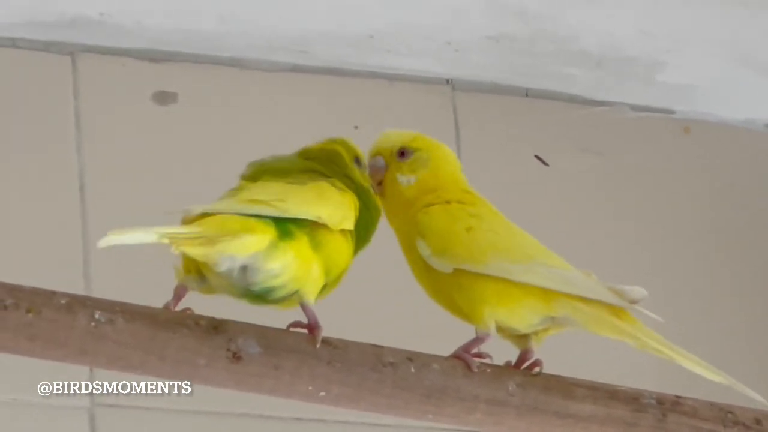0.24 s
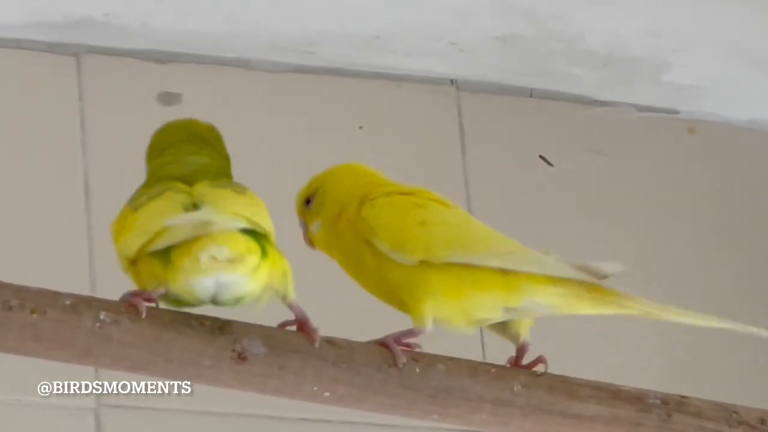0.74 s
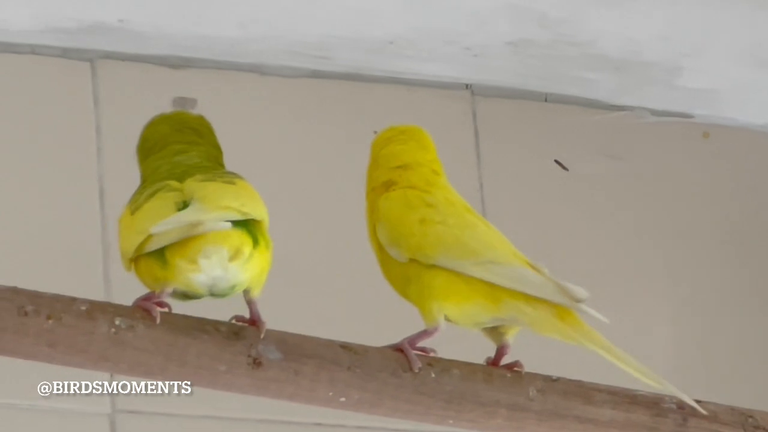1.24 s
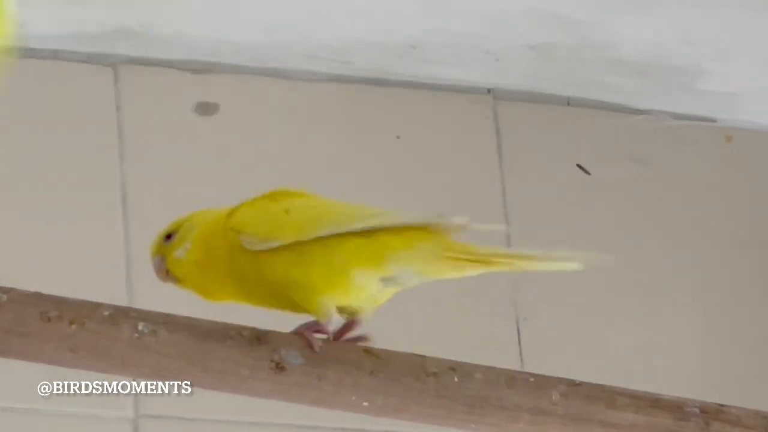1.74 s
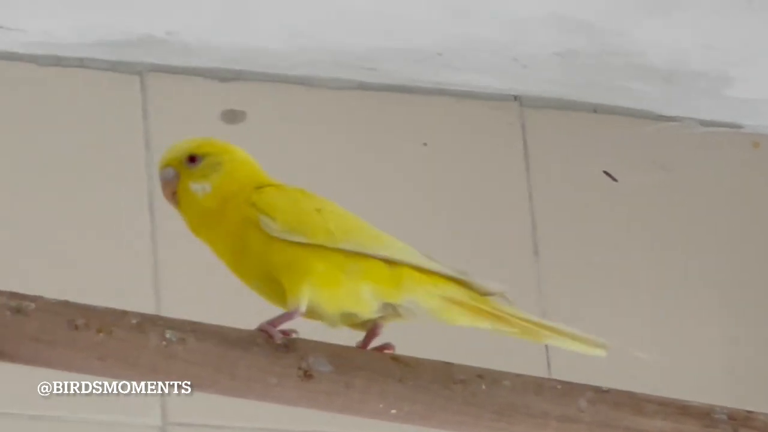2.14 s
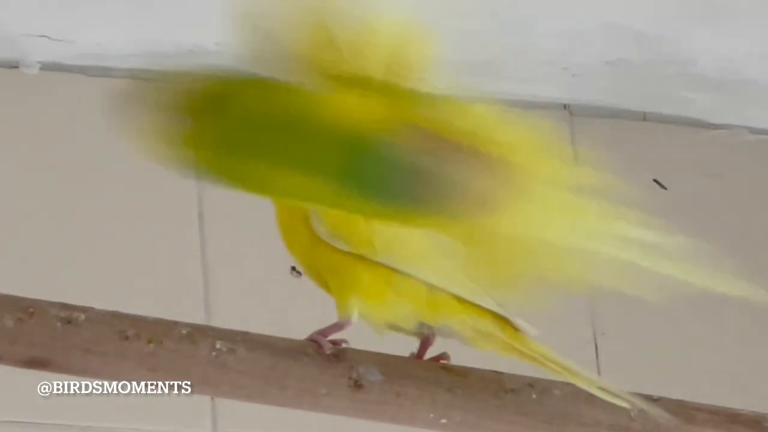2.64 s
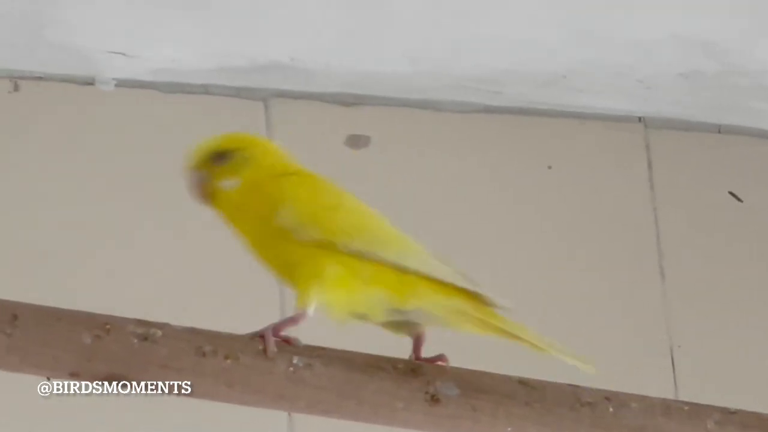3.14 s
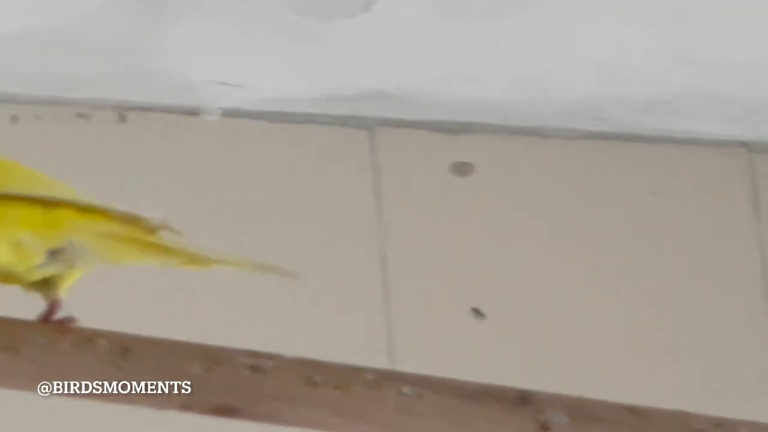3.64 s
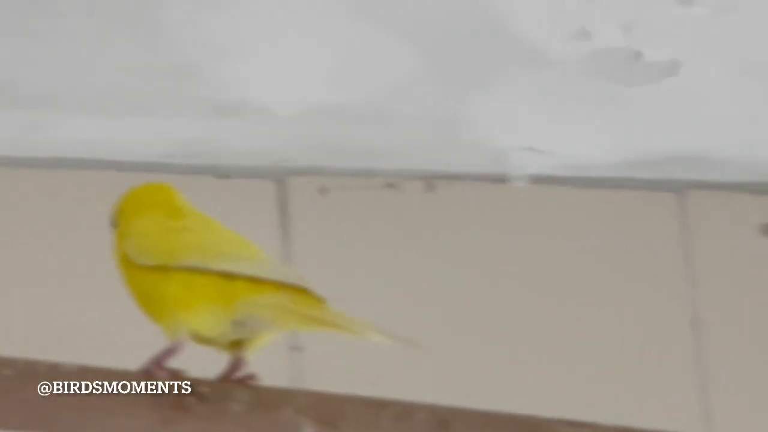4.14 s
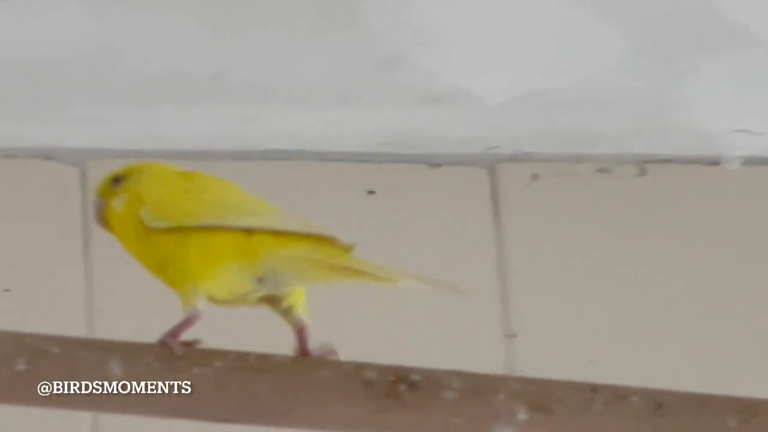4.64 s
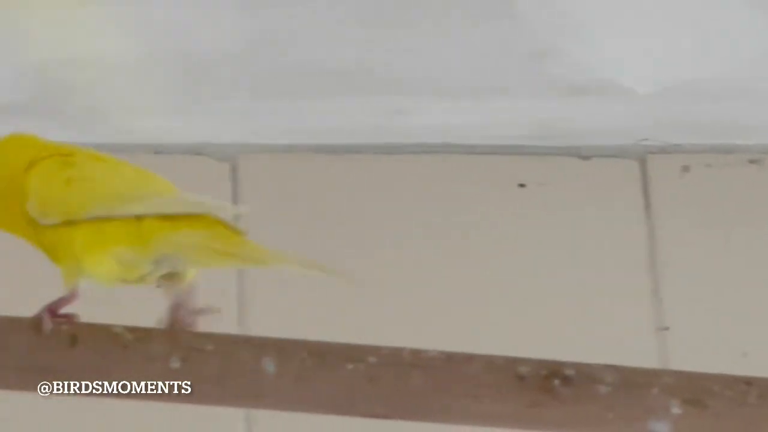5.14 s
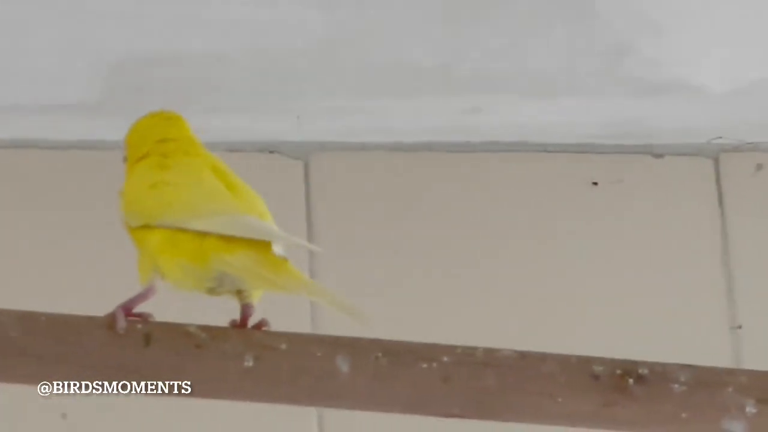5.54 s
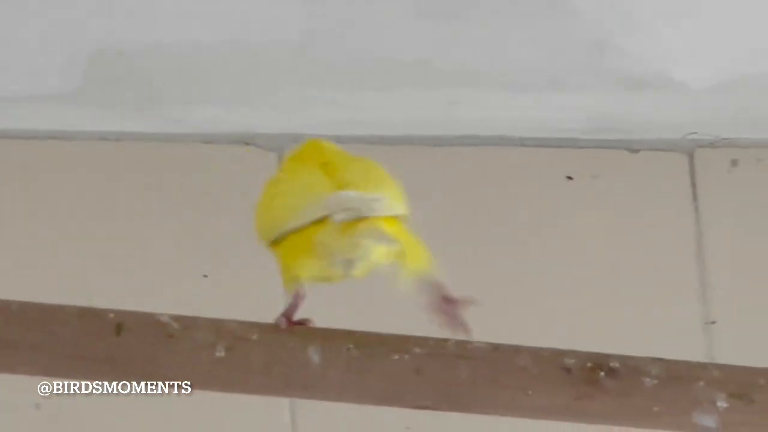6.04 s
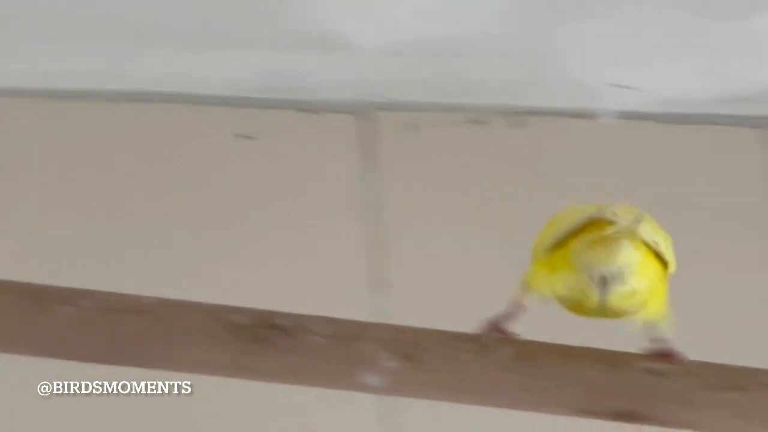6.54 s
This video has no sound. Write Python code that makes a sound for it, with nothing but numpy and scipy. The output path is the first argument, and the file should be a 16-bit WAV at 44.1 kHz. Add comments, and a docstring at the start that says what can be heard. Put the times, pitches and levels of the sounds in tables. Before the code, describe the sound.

Budgerigars chirp and warble in a tiled room, breaking twice into harsh scolding squawks with fluttering wings, over a faint hum.

```python
"""Budgerigars chatter in a tiled room: warbled whistles, nasal chups and two runs of scolding squawks.
The syrinx sings short gliding, quivering notes; in a squawk its membranes slap out harsh puffs of noise.
Two wing flutters shove the air and set a low room mode booming. Beaks and claws tick on a wooden perch,
feathers rustle, and under it all lies a bed of room air with a faint machine hum."""
import sys
import numpy as np
from scipy import signal
from scipy.fft import rfft, irfft, next_fast_len
from scipy.io import wavfile
from scipy.ndimage import map_coordinates

SR = 44100
rng = np.random.default_rng(int(sys.argv[2]) if len(sys.argv) > 2 else 0)


def wav_record(signal):
    """Record a signal, one row per channel, as 16-bit PCM in the file named by sys.argv[1]."""
    frames = np.transpose(np.atleast_2d(signal))
    bounded = np.clip(frames, -1, 1)
    # unit amplitude maps onto the largest positive 16-bit level
    quanta = np.round(bounded * 32767).astype(np.int16)
    wavfile.write(sys.argv[1], SR, quanta)


N = 298557
TIME = np.arange(N) / SR


# Loose warble notes: start_s, length_s, start_hz, mid_hz, level_db, roughness (0-1)
WARBLE = [ (0.000, 0.018, 3010, 2997, -31, 0.31), (0.722, 0.029, 4900, 4710, -51, 0.44),
          (0.834, 0.054, 4100, 3630, -40.5, 0.48), (0.886, 0.087, 3456, 3306, -33, 0.43),
          (0.908, 0.017, 2500, 2480, -36, 0.52), (0.932, 0.067, 2940, 2906, -27.5, 0.33),
          (1.345, 0.09, 2570, 2306, -48.5, 0.16), (1.433, 0.057, 3114, 2950, -34, 0.22),
          (1.490, 0.031, 4700, 3930, -34.5, 0.12), (1.642, 0.01, 6540, 5100, -38, 0.3),
          (3.195, 0.018, 4100, 4150, -41.5, 0.09), (3.788, 0.007, 3120, 2890, -34.5, 0.32),
          (3.847, 0.027, 2576, 2940, -25.5, 0.17), (4.027, 0.04, 3910, 3630, -37.5, 0.3),
          (4.123, 0.022, 2500, 2970, -24.5, 0.17), (4.413, 0.041, 3000, 2450, -36, 0.03),
          (4.458, 0.036, 2230, 2297, -32.5, 0.67), (4.477, 0.037, 2850, 3184, -36, 0.2),
          (5.798, 0.019, 2544, 2430, -30.5, 0), (6.030, 0.02, 5160, 4070, -34, 0.09),
          (6.052, 0.026, 3730, 3770, -21.5, 0.17), (6.096, 0.028, 3120, 2897, -17.5, 0.15),
          (6.133, 0.025, 3495, 3530, -25.5, 0.4), (6.139, 0.023, 2020, 1970, -36.5, 0.79),
          (6.654, 0.02, 3110, 3170, -31, 0.1), (6.680, 0.039, 1960, 1910, -37.5, 0.6)]
# Chups, a nasal grunt breaking into a falling flick:
# flick_start_s, flick_length_s, flick_hz, flick_db, grunt_length_s, grunt_hz, grunt_db
CHUPS = [(0.146, 0.037, 2644, -40, 0.017, 973, -44), (0.292, 0.049, 2605, -41.5, 0.017, 958, -46),
         (0.437, 0.022, 2677, -36.5, 0.02, 994, -44.5), (3.232, 0.015, 2560, -25, 0.027, 996, -33),
         (3.815, 0.01, 2693, -25, 0.021, 1030, -35.5), (3.941, 0.017, 2694, -32, 0.035, 812, -40.5),
         (4.070, 0.018, 2630, -24, 0.058, 1038, -40), (4.379, 0.018, 2850, -29, 0.024, 920, -34.5),
         (4.596, 0.042, 2670, -24, 0.027, 829, -35), (5.773, 0.016, 2380, -28.5, 0.03, 856, -33),
         (6.565, 0.024, 2620, -27, 0.034, 1036, -34)]
# Chirrups, a loud note and its lead-in: start_s, length_s, pitch_hz, level_db, lead_length_s, lead_db
CHIRRUPS = [(3.285, 0.029, 3011, -16, 0.022, -26.5), (4.684, 0.021, 3135, -20, 0.036, -30),
            (5.844, 0.036, 3140, -23, 0.022, -31.5), (6.611, 0.029, 3060, -20, 0.022, -26)]


def whistle_notes(tail_s=0.036, tail_db=-28):
    """Everything the syrinx whistles, laid out as rows like WARBLE."""
    notes = list(WARBLE)
    for start, length, hz, db, *_ in CHUPS:
        notes.append((start, length, hz * 1.1, hz, db, 0.23))  # falling flick
    for start, length, hz, db, lead_s, lead_db in CHIRRUPS:
        notes += [(start - lead_s, lead_s, hz, hz * 1.15, lead_db, 0.22),  # rising lead-in
                  (start, length, hz * 1.08, hz, db, 0.15),  # loud fall
                  (start + length, tail_s, hz * 0.805, hz * 0.805, tail_db, 0.42)]  # low, rough tail
    return notes


# Throat and beak EQ on the whistle overtones: freq_hz, gain_db
OVERTONE_EQ = [(3600, -3), (5200, -6), (6200, -8), (7300, 2.5), (9000, -3), (11000, -9.5), (13000, -14)]


def whistles(settle_share=0.67, quiver=0.132, flutter_db=7, arch_db=6, skirt_db=-14, third_db=-5):
    """The syrinx starts off pitch and settles; rough notes quiver in pitch and level."""
    tones, overtones = np.zeros((2, N))
    for start, length, start_hz, mid_hz, db, roughness in whistle_notes():
        t = clock(length)
        slack, mid_slack = np.exp(-t / t[-1] / settle_share), np.exp(-0.5 / settle_share)
        glide_hz = mid_hz + (start_hz - mid_hz) * (slack - mid_slack) / (1 - mid_slack)
        phase = phase_of(glide_hz * (1 + quiver * roughness * wobble(t, 454.4)))
        # pressure peaks in the middle of the note
        pressure_db = flutter_db * roughness * wobble(t, 221) - arch_db * (2 * t / t[-1] - 1) ** 2
        envelope = amp(db) * np.sqrt(2) * unit(amp(pressure_db) * gate(t, edge_s=0.0015))
        # turbulent airflow spreads a skirt around each partial, widest on the overtones
        add(tones, start, envelope * np.sin(phase) * (1 + amp(skirt_db) * wobble(t, 1106)))
        rasp = unit(1 + 0.55 * wobble(t, 1854))
        upper = np.sin(2 * phase) + amp(third_db) * np.sin(3 * phase)
        # notes sung on the throat resonance are the purest
        overtone_db = -8 - 18 * bell(mid_hz, centre_hz=2730, width_hz=1470)
        add(overtones, start, envelope * amp(overtone_db) * upper * rasp)
    return tones + equalise(overtones, OVERTONE_EQ)


# Squawks and soft rasps: start_s, swell_s, length_s, level_db, beak_hz, tilt_db_per_octave
SQUAWKS = [ (0.000, 0.0086, 0.12, -45, 6100, -5.5), (1.479, 0.02, 0.07, -37.5, 4030, -3),
           (1.646, 0.045, 0.051, -15, 3730, 10), (1.808, 0.026, 0.046, -15.5, 6000, 9),
           (2.042, 0.02, 0.066, -20, 4400, 7.5), (2.299, 0.043, 0.052, -16.5, 4750, 7.5),
           (2.402, 0.043, 0.13, -28.5, 2830, -1), (2.470, 0.012, 0.063, -18, 3870, 4),
           (2.615, 0.034, 0.062, -18, 4050, 5), (2.776, 0.039, 0.071, -17.5, 6360, 8.5),
           (2.847, 0.031, 0.082, -21, 4920, 3.5), (3.942, 0.01, 0.031, -34, 3440, -13.5),
           (4.101, 0.028, 0.027, -36, 4200, 0), (4.358, 0.0026, 0.042, -40.5, 3320, 7.5),
           (4.416, 0.009, 0.1, -34, 2170, -8), (4.589, 0.014, 0.08, -33.5, 2650, -4.5),
           (4.813, 0.026, 0.17, -44, 6540, -6), (5.052, 0.032, 0.039, -14.5, 3750, 9),
           (5.202, 0.03, 0.062, -17, 5500, 7), (5.496, 0.038, 0.046, -15, 6900, 8.5)]
# Throat EQ of a squawk: freq_hz, gain_db
SQUAWK_EQ = [(900, -65), (1300, -14.5), (1700, -4), (2400, -3), (3200, -0.5), (4400, -3), (6500, -9),
             (8300, -13.5), (9800, -17.5), (10900, -16.5), (11700, -23.5), (12700, -43)]


def squawks(slap_hz=206.8, jitter=0.24, scatter_db=1.3, decay_cycles=0.53,
            cry_hz=3394, cry_quiver=0.0972, cry_db=-8, swell_db=20, sag_db=5, release_s=0.0086):
    """The membranes slap irregularly; each slap lets a chaotic puff through throat and beak."""
    out = np.zeros(N)
    for start, swell_s, length, db, beak_hz, tilt in SQUAWKS:
        t = clock(length)
        cycle = np.cumsum(slap_hz * (1 + jitter * wobble(t, 200))) / SR % 1
        # the overdriven whistle survives inside the noise as a wildly shaking cry
        phase = phase_of(cry_hz * (1 + cry_quiver * wobble(t, 700)))
        cry = unit(sum(np.sin(k * phase) for k in range(1, 4)))
        breath = hiss(t) + amp(cry_db) * cry
        puffs = breath * np.exp(-cycle / decay_cycles) * amp(scatter_db * wobble(t, 196))
        ring_db = min(4.5 + 0.48 * (-15 - db), 13)  # softer squawks ring more in the beak
        voice = shape(puffs, lambda f: amp(lookup(SQUAWK_EQ, f)
                                           + tilt * np.log2(np.maximum(f, 1000) / 4000)
                                           + ring_db * bell(f, beak_hz, width_hz=1300)))
        # pressure builds quickly, then sags until the beak shuts
        attack_db = -swell_db * np.maximum(1 - t / swell_s, 0) ** 2.68
        droop_db = sag_db * np.maximum(t - swell_s, 0) / length
        edges = gate(t, edge_s=np.where(t < swell_s, 0.002, release_s))
        add(out, start, amp(db + attack_db - droop_db) * unit(voice) * edges)
    return out


# Lone nasal notes: start_s, length_s, pitch_hz, level_db
NASALS = [(0.722, 0.0695, 974, -43), (1.314, 0.071, 981, -49.5)]
# Throat EQ of a nasal note: freq_hz, gain_db
NASAL_EQ = [(1000, -43), (1600, -1.5), (2000, 0), (2450, -2), (3100, 0.5), (3500, 1), (4000, -12.5),
            (4900, -20.5), (6000, -37), (9000, -29)]


def nasals(pitch_sag=0.083, quiver=0.033):
    """Lone notes and chup grunts: a sinking harmonic stack whose fundamental the throat holds back."""
    out = np.zeros(N)
    grunts = [(flick_start - length, length, hz, db) for flick_start, _, _, _, length, hz, db in CHUPS]
    for start, length, pitch_hz, db in NASALS + grunts:
        t = clock(length)
        glide_hz = pitch_hz * (1 + pitch_sag * (0.5 - t / t[-1]))
        phase = phase_of(glide_hz * (1 + quiver * wobble(t, 417)))
        tone = sum(amp(lookup(NASAL_EQ, k * pitch_hz)) * np.sin(k * phase) for k in range(1, 9))
        add(out, start, amp(db) * unit(tone * gate(t, edge_s=0.0032)))
    return out


# Bouts of flapping: start_s, length_s, hardest_beat_s, level_db, boom_db
FLUTTERS = [(1.626, 1.08, 2.208, -40.5, -35), (5.004, 0.66, 5.38, -41.5, -42.5)]
# Low thump of shoved air: freq_hz, gain_db
THUMP_EQ = [(35, -34), (58, -7), (74, 6.5), (90, -8), (115, -9), (190, -7.5), (300, -13.5), (600, -51)]
# Whoosh through the feathers: freq_hz, gain_db
WHOOSH_EQ = [(150, 6), (300, -7), (500, 17.5), (800, 1), (1500, -7), (4000, 8), (9000, -32), (13000, -65)]


def wings(beat_hz=17, unevenness=0.0775, thump_db=-1, whoosh_db=-20.5, arch_db=5.5,
          boom_hz=130.3, boom_arch_db=25.5):
    """Each downstroke shoves the air and rushes through the feathers; the room booms at one low mode."""
    effort, boom_level = np.zeros((2, N))
    for start, length, hardest_s, db, boom_db in FLUTTERS:
        t = clock(length)
        edges = gate(t, edge_s=0.035)
        falloff = (2 * (start + t - hardest_s) / length) ** 2
        add(effort, start, edges * amp(db - arch_db * falloff))
        add(boom_level, start, edges * amp(boom_db - boom_arch_db * falloff))
    cycle = np.cumsum(beat_hz * (1 + unevenness * wobble(TIME, 6.8))) / SR % 1
    stroke = np.exp(-cycle / 0.99) * np.minimum(cycle / 0.2, 1)
    thump = unit(colour(rng.standard_normal(N), THUMP_EQ) * stroke)
    whoosh = unit(colour(diffuse(N), WHOOSH_EQ) * stroke)
    boom = drone(boom_hz, drift_hz=1, rate_hz=11)
    # feather noise grows more slowly with effort than the shove of air
    return amp(thump_db) * effort * thump + amp(whoosh_db) * np.sqrt(effort) * whoosh + boom_level * boom


# Beak and claw hits: start_s, level_db
TICKS = [(0.2331, -31), (0.441, -45), (0.5227, -40), (0.6479, -42.5), (0.8043, -45), (1.052, -37),
         (1.3244, -40.5)]
# Tone of a tick on the perch: freq_hz, gain_db
TICK_EQ = [(700, -25), (1800, 6.5), (3500, -11), (6000, -5), (9000, -2.5), (11500, 0.5), (13000, -32)]


def ticks(decay_s=0.0025, gain_db=1):
    """Beaks and claws click on the perch, each a fast-dying burst of noise."""
    out, t = np.zeros(N), clock(0.033)
    for start, db in TICKS:
        add(out, start, amp(db + gain_db) * colour(hiss(t), TICK_EQ) * np.exp(-t / decay_s))
    return out


# Swells of nuzzling and shuffling: middle_s, half_length_s, level_db
SHUFFLES = [(0.0, 0.34, -51.5), (0.93, 0.18, -59), (2.202, 0.95, -52), (6.77, 0.22, -59.5)]
# Bright brush of feathers: freq_hz, gain_db
RUSTLE_EQ = [(1000, -15), (2500, 9), (4500, -3.5), (7000, -3), (11000, 3.5), (13000, -26)]


def rustle(grain_db=6, fidget_db=-61):
    """Feather barbs brush past each other in small uneven grains, never quite at rest."""
    grains = rng.standard_normal(N) * amp(grain_db * wobble(TIME, 140))
    motion = amp(fidget_db) + sum(amp(db) * hump(middle, half) for middle, half, db in SHUFFLES)
    return colour(grains, RUSTLE_EQ) * motion


# Room tone: freq_hz, gain_db
AIR_EQ = [(20, -23), (45, 0.5), (90, 5.5), (140, -2.5), (290, -4.5), (410, 4.5), (520, -3.5), (800, -4),
          (1200, -7.5), (2000, -11.5), (2900, -19.5), (4500, -30.5), (7000, -37.5), (11000, -50.5),
          (13000, -56)]
# Machine hum partials: pitch_hz, level_db
HUM = [(48.4, -57), (188.4, -59), (387.6, -58), (823.6, -60.5)]


def background(air_db=-42.5, swell_db=2.07, waver_db=1.05, dip_db=2.5):
    """Room air and a faint, wavering machine hum; the level of both dips briefly midway."""
    air = amp(air_db + swell_db * wobble(TIME, 2.34)) * colour(diffuse(N), AIR_EQ)
    hum = sum(amp(db + waver_db * wobble(TIME, 5.5)) * drone(hz, drift_hz=3, rate_hz=14)
              for hz, db in HUM)
    return (air + hum) * amp(-dip_db * hump(middle_s=3.35, half_s=0.53))


# Left-right likeness of diffuse sound: freq_hz, correlation (1 is mono)
STEREO_LIKENESS = [(60, 1), (190, 0.95), (400, 0.34), (800, 0.042), (1400, 0.4), (2100, 0.95), (3000, 0.94),
                   (12000, 1)]


def diffuse(size):
    """Noise arriving from all sides at the two microphone ports."""
    mid, side = rng.standard_normal((2, size))
    mid = shape(mid, lambda f: np.sqrt((1 + lookup(STEREO_LIKENESS, f)) / 2))
    side = shape(side, lambda f: np.sqrt((1 - lookup(STEREO_LIKENESS, f)) / 2))
    return np.array([mid + side, mid - side])


def room(x, early_t60_s=0.018, early_db=-0.5, ring_t60_s=0.45, ring_db=2.5):
    """Quick reflections from wall and ceiling, then the ring of the tiled room."""
    t = clock(1)
    echoes = 0
    for delay_s, t60_s, db in [(0.002, early_t60_s, early_db), (0.009, ring_t60_s, ring_db)]:
        fade = amp(-60 * t / t60_s) * (t > delay_s)
        echoes += amp(db) * diffuse(len(t)) * fade / np.linalg.norm(fade)
    return signal.fftconvolve(x[None], echoes, axes=1)[:, :N]


def amp(db):
    """Decibels to gain."""
    return 10 ** (np.asarray(db) / 20)


def unit(x):
    """Scale to an rms of 1."""
    return x / np.sqrt(np.mean(x ** 2) + 1e-20)


def lookup(curve, hz):
    """Read a curve on a log-frequency axis."""
    f, value = np.transpose(curve)
    return np.interp(np.log(np.maximum(hz, 1)), np.log(f), value)


def shape(x, response):
    """Filter by a function from Hz to gain."""
    size = next_fast_len(x.shape[-1] + 2048)
    return irfft(rfft(x, size) * response(np.fft.rfftfreq(size, 1 / SR)), size)[..., :x.shape[-1]]


def equalise(x, eq):
    """Apply an EQ curve."""
    return shape(x, lambda f: amp(lookup(eq, f)))


def colour(x, eq):
    """Apply an EQ curve and scale to an rms of 1."""
    return unit(equalise(x, eq))


def bell(f, centre_hz, width_hz):
    """Power response of one resonance, 1 at its centre."""
    return (f * width_hz) ** 2 / ((centre_hz ** 2 - f ** 2) ** 2 + (f * width_hz) ** 2)


def wobble(t, rate_hz):
    """Smooth random motion with a spread near 1."""
    return map_coordinates(rng.standard_normal(1024), [t * rate_hz], order=3, mode="wrap")


def phase_of(hz):
    """Running phase of a moving pitch."""
    return 2 * np.pi * np.cumsum(hz) / SR


def drone(hz, drift_hz, rate_hz):
    """A sustained sine with wandering pitch, at an rms of 1."""
    return unit(np.sin(phase_of(hz + drift_hz * wobble(TIME, rate_hz))))


def clock(length_s):
    """Sample times of a short sound."""
    return np.arange(max(int(length_s * SR), 32)) / SR


def hiss(t):
    """White noise for a short sound."""
    return np.resize(rng.standard_normal(8192), len(t))


def gate(t, edge_s):
    """Soft start and stop of a note."""
    return np.sin(np.pi / 2 * np.clip(np.minimum(t, t[-1] - t) / edge_s, 0, 1)) ** 2


def hump(middle_s, half_s):
    """A smooth rise to 1 and fall back."""
    return np.exp(-((TIME - middle_s) / half_s) ** 2)


def add(track, start_s, x):
    """Mix a sound into the track at a time."""
    i = max(int(start_s * SR), 0)
    track[i:i + len(x)] += x[:max(N - i, 0)]


# Fader ride on the direct song as the birds turn to and from the microphone: time_s, gain_db
HEAD_TURNS = [(0, -1), (.9, -0.5), (1.45, 3.5), (3.25, 2.5), (4.1, 1.5), (4.6, 2.5), (5.85, -9), (6.1, 0),
              (6.6, -3.5)]


def scene(song_db=-4, squawk_db=-2, rustle_db=-4):
    """Voices and small noises feed the room; wings and background join after the reverb."""
    song = amp(song_db) * (whistles() + nasals())
    noises = amp(squawk_db) * squawks() + ticks() + amp(rustle_db) * rustle()
    direct = song * amp(np.interp(TIME, *np.transpose(HEAD_TURNS))) + noises
    return direct + room(song + noises) + wings() + background()


# Level of the left port over the right: freq_hz, balance_db
PORT_BALANCE = [(40, 2), (130, -3), (400, -1.5), (800, 2.5), (1300, 0), (3000, 0)]
# Phase lead of the left port: freq_hz, lead_rad
PORT_PHASE = [(2000, 0), (3200, .7), (5000, .5), (6500, 0), (8800, 0), (9500, -2), (10300, -3.14),
              (11300, -5), (12000, -5.45)]


def record(dry, ceiling=0.8, top_hz=12900):
    """The two ports differ in phase and level; the loudest peaks are rounded and the top is cut steeply."""
    left = shape(dry[0], lambda f: amp(lookup(PORT_BALANCE, f) / 2)
                 * np.exp(1j * np.interp(f, *np.transpose(PORT_PHASE))))
    right = shape(dry[1], lambda f: amp(-lookup(PORT_BALANCE, f) / 2))
    ports = np.array([left, right])
    rounded = ports / (1 + (ports / ceiling) ** 6) ** (1 / 6)
    high_cut = signal.ellip(8, 0.2, 70, top_hz, fs=SR, output="sos")
    return signal.sosfilt(high_cut, rounded)


dry = scene()
out = record(dry)
wav_record(out)
```